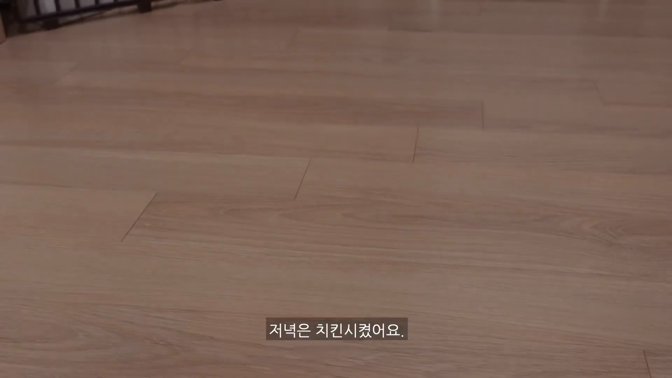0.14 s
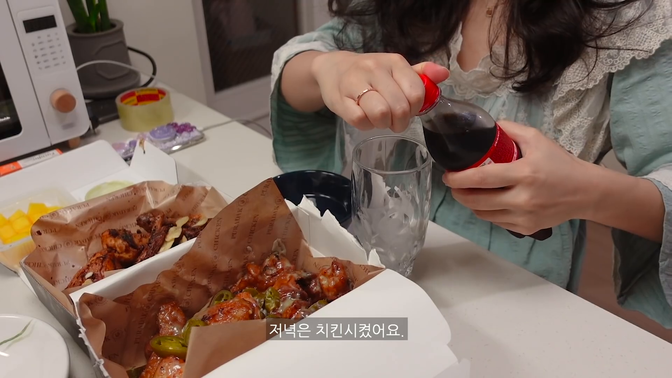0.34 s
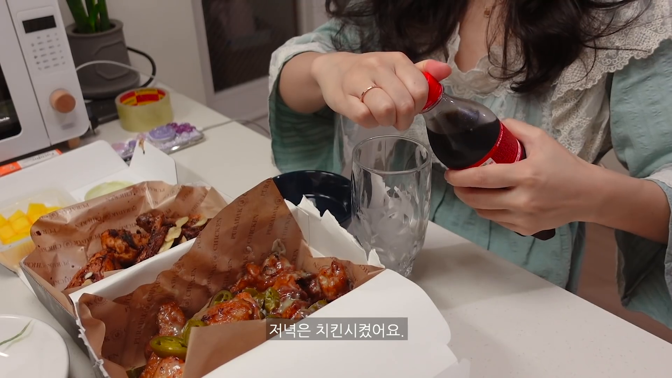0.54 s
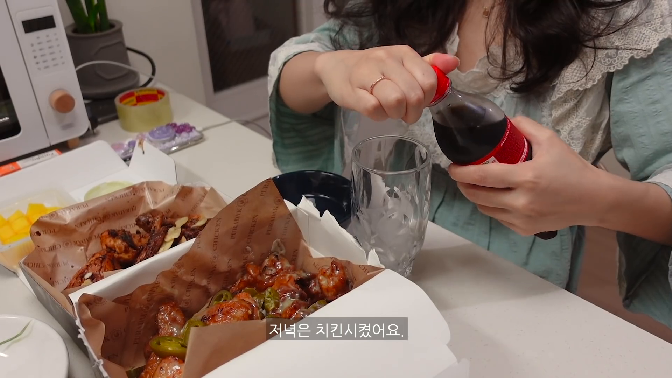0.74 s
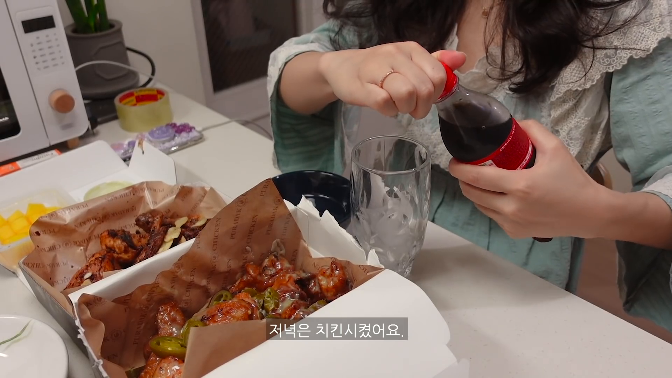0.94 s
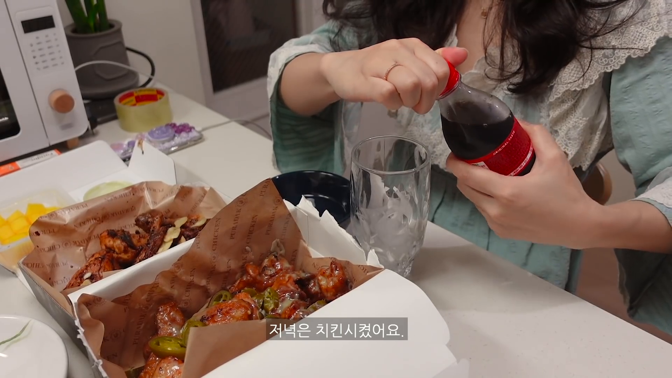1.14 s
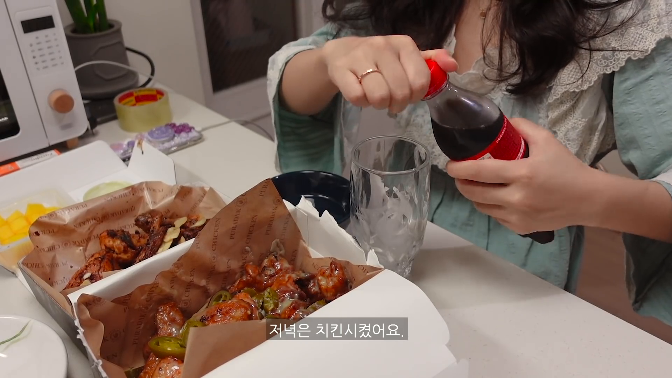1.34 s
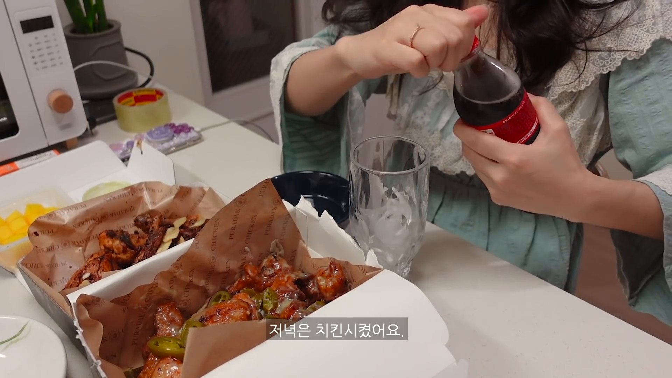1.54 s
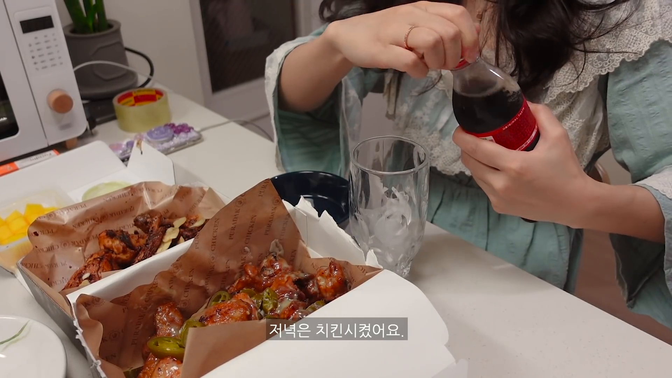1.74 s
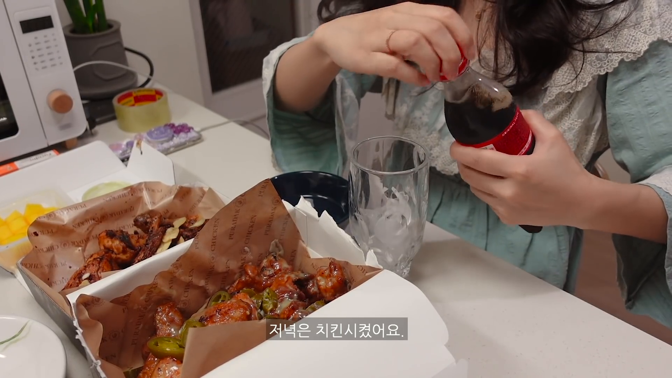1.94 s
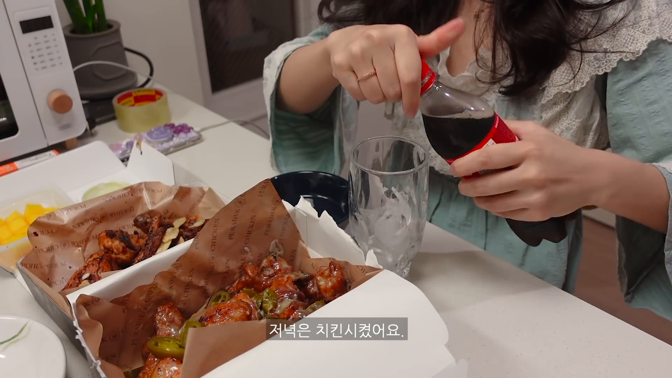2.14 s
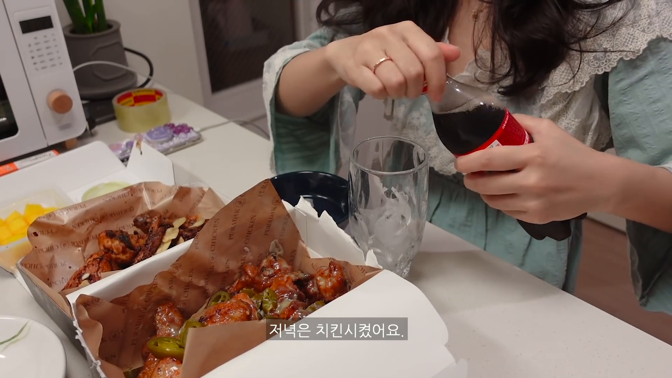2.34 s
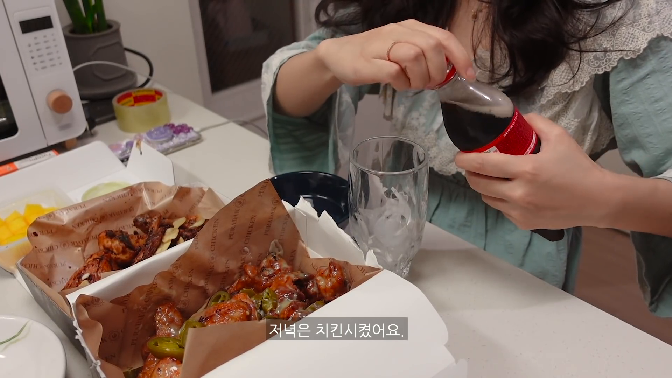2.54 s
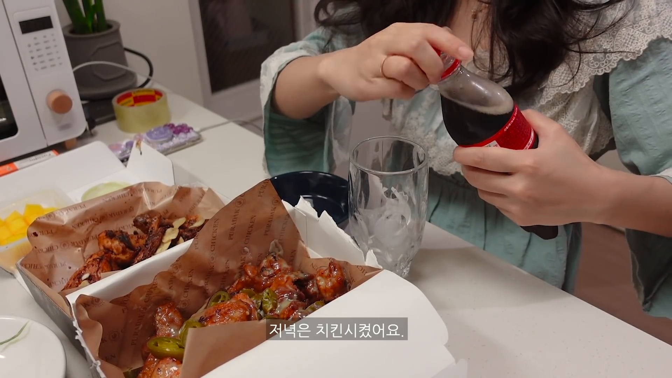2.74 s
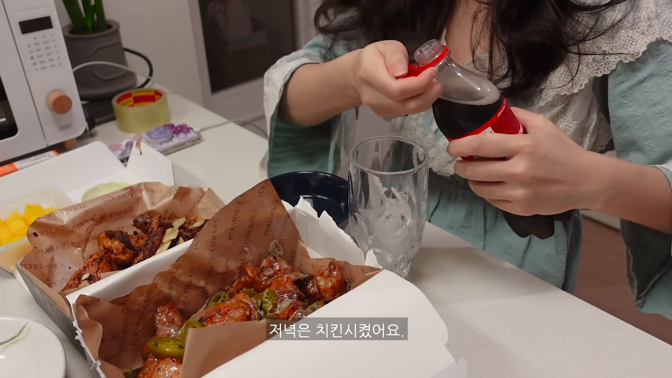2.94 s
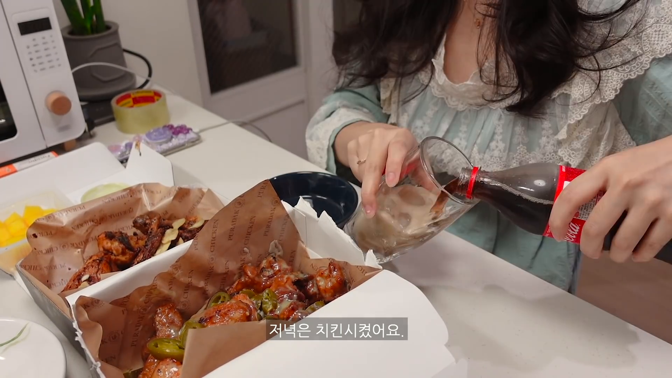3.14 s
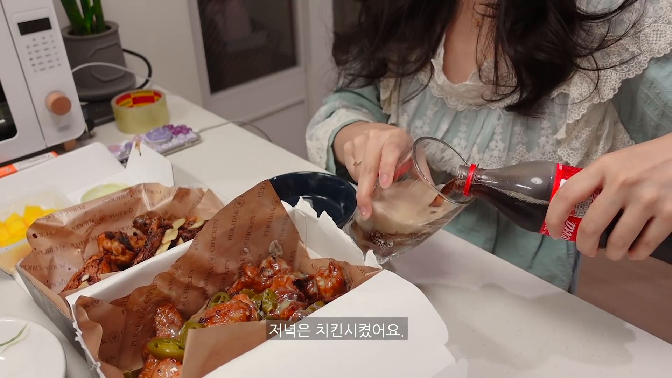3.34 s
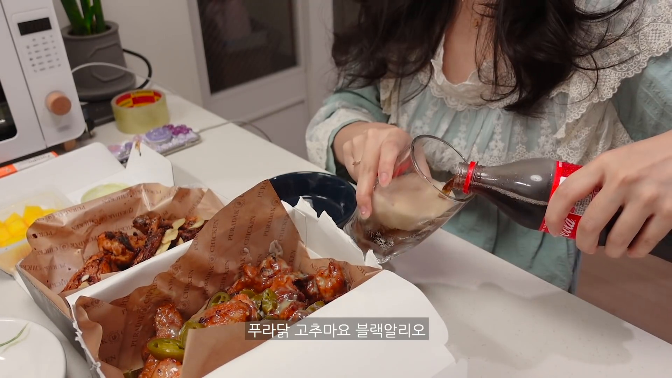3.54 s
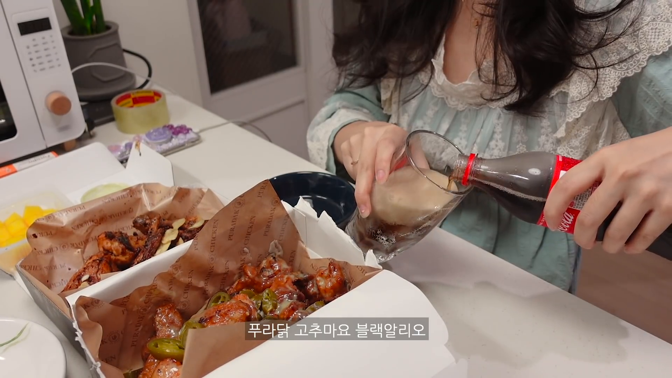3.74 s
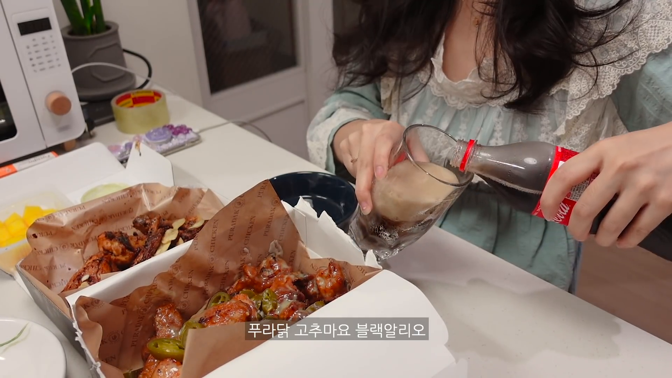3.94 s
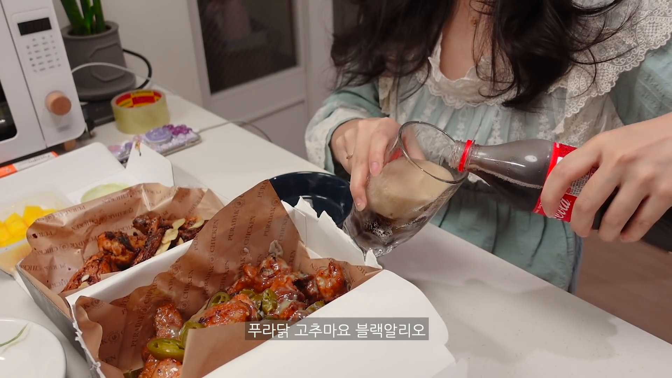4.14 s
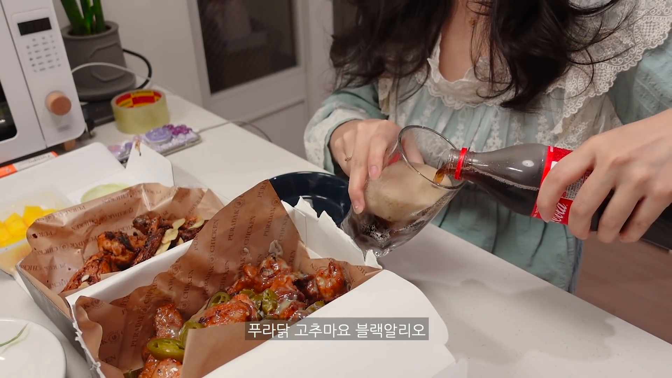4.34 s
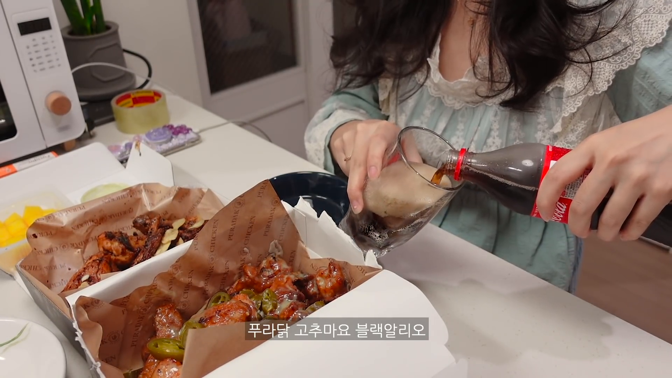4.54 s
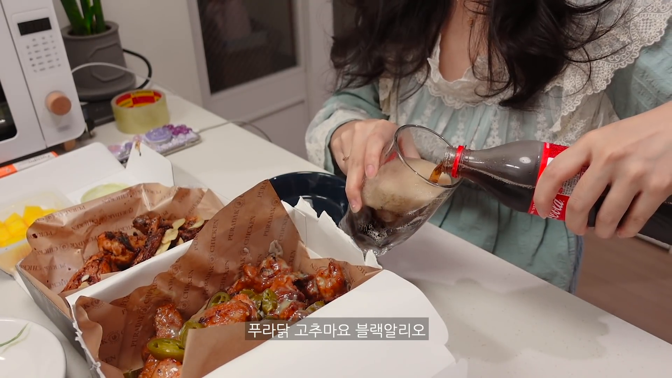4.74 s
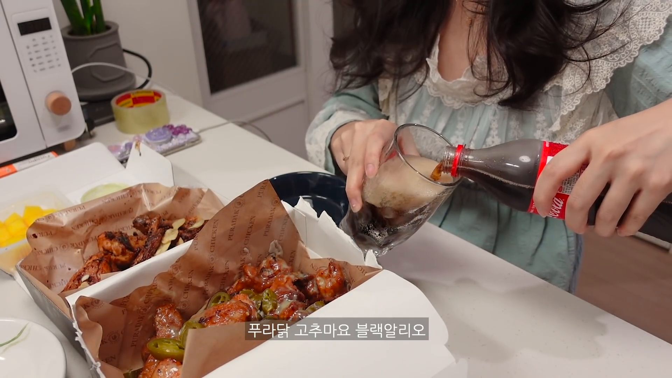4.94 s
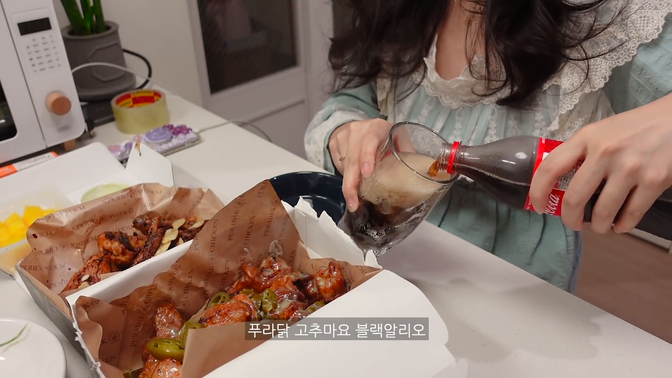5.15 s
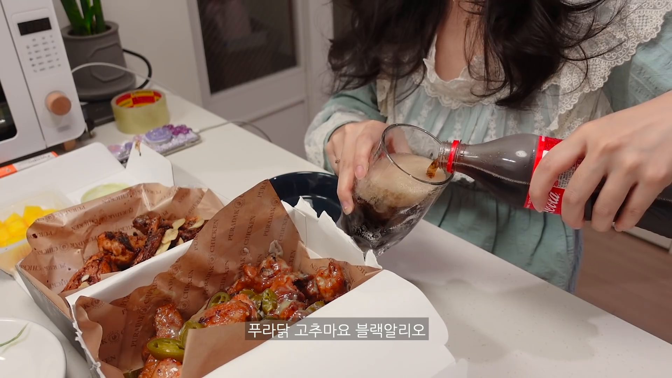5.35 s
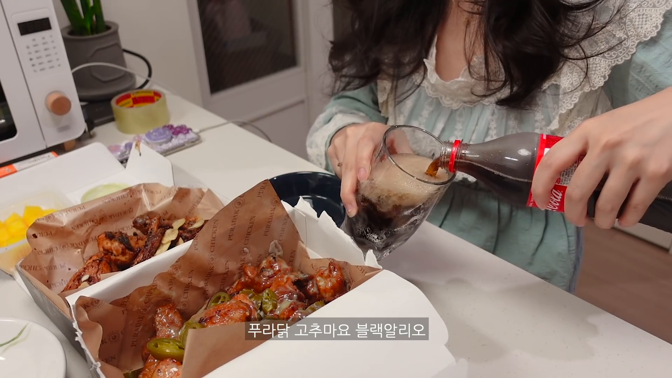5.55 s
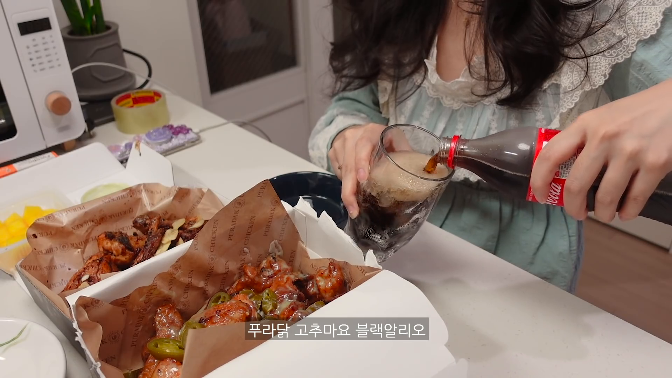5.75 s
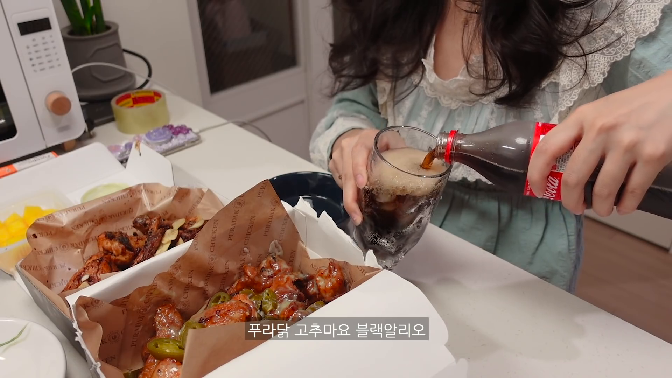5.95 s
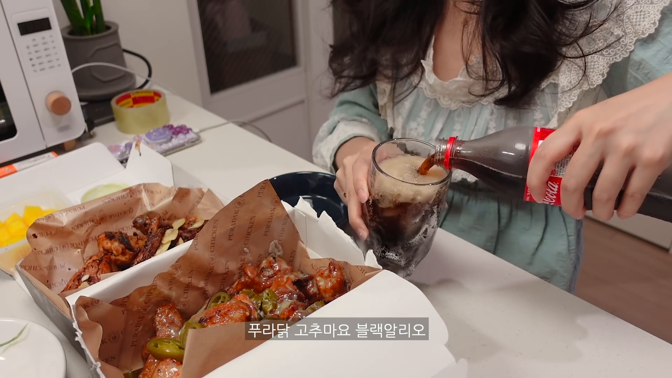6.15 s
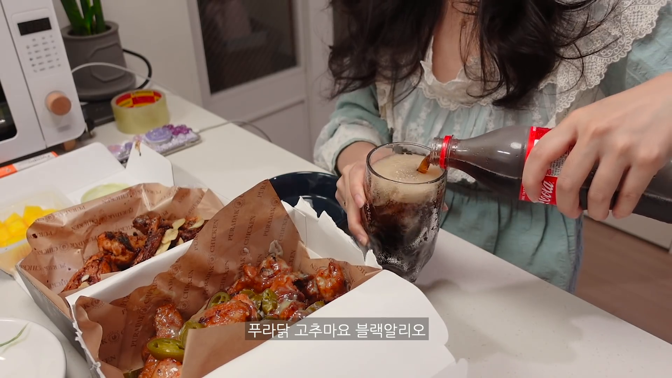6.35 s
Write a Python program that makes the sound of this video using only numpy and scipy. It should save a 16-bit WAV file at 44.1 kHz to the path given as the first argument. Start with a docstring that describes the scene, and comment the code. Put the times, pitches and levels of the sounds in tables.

```python
"""Three moments in a home kitchen, joined by hard cuts.
First a small metal piece jingles in decaying modes over a scuffle of filtered clicks and a hollow bump.
Then a plastic soda bottle opens over soft room noise: gas hisses as a jet of noise through the cap thread,
cap and seal ring snap as resonant cracks, dull spurts follow, and the cap squeaks one thin note.
Last, soda pours into a tilted glass: foam fizzes in tiny pops, bubbles gurgle, the bottle knocks, once loudly."""
import sys
import numpy as np
from scipy import signal
from scipy.fft import rfft, irfft
from scipy.io import wavfile
from scipy.ndimage import map_coordinates

SR = 44100
rng = np.random.default_rng(int(sys.argv[2]) if len(sys.argv) > 2 else 0)


def digitize_waveform(pressure):
    """Quantize a signal to 16-bit integers and store it at the path in sys.argv[1].

    Rows of a 2-D input are taken as channels; values are limited to [-1, 1].
    """
    field = np.atleast_2d(pressure).T
    bounded = np.clip(field, -1, 1)
    quanta = np.round(bounded * 32767).astype(np.int16)
    wavfile.write(sys.argv[1], SR, quanta)


N = 282240
T = np.arange(N) / SR  # time axis [s]

OPEN_S, POUR_S = 0.2425, 3.113  # cuts to the opening and to the pour
TOP_HZ = 15700  # upper edge of the final low-pass

# modes of the metal piece: (frequency [Hz], level [dB], t60 [s])
METAL_MODES = [(2860, 0.5, 0.3), (2880, -9, 0.35), (6660, -11, 0.22), (5800, -20, 0.2), (5630, 3.5, 0.064),
               (7994, 3.5, 0.14), (8100, -32, .25), (11500, -11, 0.18), (11800, -23, 0.45)]
# shakes of the metal piece: (time [s], level [dB], extra on its high modes [dB])
SHAKES = [(0.002, -35.5, -9), (0.078, -42.5, 0), (0.103, -45, 4)]
# colour of the scuffle: (frequency [Hz], level [dB])
SCUFFLE_COLOUR = [(60, -48), (250, -13), (500, -4), (750, 3.5), (1050, -4.5), (1550, 0.5), (2100, -7),
                  (2800, -1), (3700, -7), (5500, 2), (7000, -7.5), (11000, -24), (13000, -32)]
SCUFFLE_DB, SCUFFLE_FADE_DB_S = -38, 44  # starting level; steady fade in dB per second
# modes of the short hollow bump: (frequency [Hz], level [dB], t60 [s])
BUMP_MODES = [(762, 4, 1), (1180, -0.5, 0.27), (1657, 1, 0.25), (1730, -8, 0.19)]
BUMP_S, BUMP_DB = 0.227, -43.5

# flow of the escaping gas, before the trim: (time [s], level [dB])
GAS_FLOW = [(0.245, -25), (0.257, -22.5), (0.513, -35.5), (0.547, -34), (0.673, -40), (0.865, -34),
            (0.887, -29.5), (1.025, -27), (1.073, -31.5), (1.14, -45)]
# higher resonances of the thread channel: (frequency [Hz], width of each of two passes [Hz], level [dB])
THREAD_RESONANCES = [(4680, 580, 5.5), (5990, 730, -2), (7260, 2600, 2.5), (9050, 250, 6.5),
                     (10470, 900, 6.5), (11140, 670, 4.5), (13060, 3200, -1.5)]
# colour of the free jet: (frequency [Hz], level [dB])
JET_COLOUR = [(200, -49), (700, -39.5), (1000, -21.5), (1600, -13.5), (2300, -7), (3400, -6.5), (4500, -3),
              (8000, -2.5), (10500, -6), (13000, -12.5), (16000, -18)]
GAS_DB, GAS_FADE_DB_S = -1.5, 150  # trim; how fast the hiss dies away after the last flow row [dB per second]
# the gap widens as the cap turns, so its lowest resonance sinks: pitches, midpoint, time constant
GAP_TIGHT_HZ, GAP_WIDE_HZ, GAP_WIDENS_S, GAP_WIDENING_S = 2810, 2294, 0.75, 0.065
# then the seal lets go and most of the flow bypasses the thread channel: midpoint, time constant, power shares
SEAL_OPENS_S, SEAL_OPENING_S, BYPASS_TIGHT, BYPASS_LOOSE = 0.87, 0.018, 0.13, 0.85
NECK_HZ, NECK_WIDTH_HZ, NECK_DB = 266, 71, -42.5  # air in the bottle hums under the free jet; dB against it
GAS_ROOM_DB = -6  # share of the hiss that comes back from table and walls

# colour of the room's air noise: (frequency [Hz], level [dB])
KITCHEN_COLOUR = [(30, -26), (70, -40), (110, -27.5), (170, -18.5), (280, -15.5), (480, -16.5), (700, -9.5),
                  (1050, -1), (1450, -4), (2400, -10), (3200, -11.5), (7000, -19), (15000, -35.5)]
KITCHEN_DB = -58

# snaps of cap and seal ring: (time [s], level [dB], resonance [Hz], treble [dB])
SNAPS = [(1.311, -53, 6000, -4.5), (1.3896, -40.5, 4130, 5), (1.396, -43.5, 4060, 2),
         (1.511, -38.5, 2410, -11), (1.518, -37.5, 3260, -20), (1.570, -44.5, 4040, 0),
         (1.741, -49.5, 3060, -39), (1.784, -37.5, 6450, 6.5), (1.9695, -28, 4590, 10.5),
         (2.4257, -35.5, 5320, 7), (2.637, -43, 2200, -19), (2.714, -29.5, 4600, 9.5),
         (2.8546, -27.5, 4360, 8.5), (2.880, -31, 3520, 6.5), (2.9603, -26, 3800, 15),
         (2.994, -26.5, 4130, 5), (3.027, -38.5, 3440, -11), (3.0456, -25.5, 3000, 15),
         (3.047, -29.5, 2200, -20)]
# colour of the stiff plastic: (frequency [Hz], level [dB])
PLASTIC_COLOUR = [(100, -42), (400, -26), (700, -10), (1500, -1.5), (2500, 5), (4000, 5), (5700, 5),
                  (7700, 4.5), (10000, -6), (12000, -7), (16000, -14)]
# the harder the snap, the more its resonance stands out: base dB at a hard snap, and dB per dB of level
HARD_SNAP_DB, SNAP_RING_DB, RING_PER_DB = -24.5, 13, 0.77
SNAP_RATTLE_T60_S, SNAP_RATTLE_DB, SNAP_ROOM_DB = 0.04, 2, -3
CAP_RIGHT_DB = 1.5  # the cap sits a little to the right
# the hollow bottle sounding with some snaps, its pitch set by the grip: (time [s], level [dB], pitch [Hz])
HOLLOWS = [(1.390, -63, 468), (2.638, -68, 476), (2.853, -50.5, 1128), (2.961, -56, 649), (3.046, -50, 612)]
HOLLOW_T60_S = 0.42

# later twists let out last spurts of gas: (time [s], level [dB], t60 [s])
SPURTS = [(1.40, -52.5, 1), (1.511, -35, .36)]
SPURT_ATTACK_S, SPURT_TREBLE_DB = 0.0045, -9.5

# the cap squeaks faintly as it turns
SQUEAK_S, SQUEAK_HZ, SQUEAK_DB = 2.073, 2530, -59.5
SQUEAK_ATTACK_S, SQUEAK_HOLD_S, SQUEAK_T60_S = 0.053, 0.11, 0.2

# colour of the foam: (frequency [Hz], level [dB])
FOAM_COLOUR = [(60, -37), (300, -20.5), (1000, -1.5), (2800, 6), (4500, 2), (6300, 1), (7300, -2.5),
               (8200, 4.5), (10600, 1), (11700, 1.5), (12500, -1.5), (13600, 2), (16000, -2)]
# bands of the young foam's sizzle: (frequency [Hz], width of each of two passes [Hz], level [dB])
SIZZLE_BANDS = [(9320, 1300, -0.5), (13700, 1600, -12)]
# foam hisses steadily; it flares up when the first soda hits the dry glass, then settles
FOAM_DB, FLARE_DB, FLARE_S, FLARE_WIDTH_S = -57, 3.3, 3.67, 0.33
# the sizzle, in dB over the foam, grows until the flare and then thins out
SIZZLE_DB, SIZZLE_RISE_DB_S, SIZZLE_FADE_DB_S = -2.5, 9, 6
FOAM_ROOM_DB = -4  # share of the foam that comes back from table and walls

# flow of the pour, before the trim: (time [s], splash level [dB])
POUR_FLOW = [(3.16, -55.5), (3.4, -54.5), (3.77, -52.5), (5.24, -50.5), (5.49, -53.5), (6.09, -52),
             (6.39, -66)]
# colour of the splash: (frequency [Hz], level [dB])
SPLASH_COLOUR = [(100, -49), (300, -60.5), (500, -23.5), (780, -13), (1050, 3.5), (1650, -7), (2450, 5.5),
                 (3300, 3), (4000, 5.5), (5000, 4.5), (6000, -4.5), (8000, -10), (15000, -61)]
SPLASH_DB, WOBBLE_DB = -2.5, 1.5  # trim; rms size of the stream's wobble
# air resonances of the glass: (frequency [Hz], width [Hz], level [dB])
GLASS_RESONANCES = [(514, 20, 9), (676, 19, 8), (1100, 390, -5.5), (4600, 117, -6), (7140, 250, 4)]
# gulps of air dragged under by the stream: (time [s], level [dB], trim of its one large bubble [dB])
GULPS = [(3.114, -47.5, -1.5), (3.431, -59, 0.5), (3.558, -49.5, -16), (3.62, -48, -21), (3.774, -49.5, -4),
         (3.855, -50, 1), (3.921, -46.5, -23), (3.99, -49, -20), (4.262, -57.5, -1.5), (4.107, -42.5, -6),
         (4.348, -47, -26), (4.449, -43, -19), (4.51, -52.5, 4.5), (4.578, -45.5, -4.5),
         (4.899, -48.5, -17), (4.942, -54, -22), (5.028, -49.5, -18), (5.172, -42, -14),
         (5.332, -48.5, -17), (5.493, -51.5, -10.5), (5.686, -48, -7.5), (5.972, -50.5, -5),
         (6.03, -48, -8), (6.125, -52.5, -1)]
# colour of the churning water: (frequency [Hz], level [dB])
GULP_COLOUR = [(100, -31), (300, -60.5), (480, -11), (780, -2), (1050, 7.5), (1600, 5.5), (2600, 11),
               (3400, 5), (4700, 2.5), (6500, -6), (15000, -12)]
GULP_LENGTH_S, GULP_BUBBLE_HZ, GULP_DETUNE = 0.02302, 1102, 0.029  # detune: pitch spread, as a share
FALTER_DB, FALTER_S = -4.5, 0.066  # deepest dip of the flow, and its length just before each gulp
SMALL_GULP_DB, SMALL_GULP_BUBBLE_DB = -59.5, -3.5  # lesser gulps come at random

# knocks of the bottle on the glass: (time [s], level [dB], rattle t60 [s], treble [dB])
KNOCKS = [(4.1, -47.5, 0.011, -3), (4.448, -46, 0.058, -8), (5.17, -38.5, 0.038, -24),
          (6.2300, -26, 0.04, -2)]
# colour of the knocks: (frequency [Hz], level [dB])
KNOCK_COLOUR = [(100, -40), (280, -34), (400, -18), (650, -7), (950, -1), (1550, -2.5), (2200, 2),
                (3500, 2), (5200, -0.5), (6500, -6), (9000, -13), (15000, -22)]
# resonances of the bottle wall as it knocks: (frequency [Hz], width [Hz], level [dB])
WALL_RESONANCES = [(2200, 480, -2.5), (3480, 210, 4), (4630, 330, 7.5), (5950, 61, 16), (12000, 190, 7)]
# air in the glass ringing with each knock, before the knock colour:
# (frequency [Hz], level over the knock [dB], t60 [s])
KNOCK_RING = [(1036, -1.5, 0.049), (1120, -3, 0.12)]

# stereo width of the microphone pair: (frequency [Hz], level of the side signal [dB])
MIC_WIDTH = [(150, -13.5), (500, -6), (1000, -5.5), (2500, 0), (6000, 2.5), (13000, 3.5)]


def undb(db):
    """Decibels to gain."""
    return 10 ** (np.asarray(db) / 20)


def curve(rows, axis=1):
    """One column of a table, joined by straight lines in time."""
    rows = np.asarray(rows)
    return np.interp(T, rows[:, 0], rows[:, axis])


def ease(s, time_constant):
    """A smooth step from 0 to 1 around time s."""
    return (1 + np.tanh((T - s) / time_constant / 2)) / 2


def unit(x):
    """Scale to rms 1."""
    return x / np.sqrt(np.mean(x ** 2))


def strength(x, db):
    """Give a short sound the energy of 10 ms at this level."""
    return unit(x) * np.sqrt(SR / 100 / x.shape[-1]) * undb(db)


def fade(t, t60):
    """Exponential decay, 60 dB down after t60."""
    return np.exp(-np.log(1000) * t / t60)


def add(track, s, sound):
    """Mix a sound into a track from time s on."""
    start = max(int(s * SR), 0)
    track[..., start:start + sound.shape[-1]] += sound[..., :N - start]


def colour(x, points):
    """Causal minimum-phase filter with the given (Hz, dB) shape."""
    n = x.shape[-1]
    hz, db = np.transpose(points)
    log_hz = np.log(np.fft.rfftfreq(n, 1 / SR) + 1)
    log_gain = np.log(undb(np.interp(log_hz, np.log(hz), db)))
    # folding the cepstrum onto positive times makes the filter causal
    folded = irfft(log_gain, n) * (1 + np.sign(np.fft.fftfreq(n)))
    return irfft(rfft(x) * np.exp(rfft(folded)), n)


def resonate(x, peaks):
    """Parallel resonances (Hz, width Hz, dB)."""
    total = 0
    for hz, width, db in peaks:
        b, a = signal.iirpeak(min(hz, SR / 2 - 1), hz / width, SR)
        total = total + undb(db) * signal.lfilter(b, a, x)
    return total


def steep(x, peaks):
    """Resonances with steep skirts: each is applied twice."""
    return sum(resonate(resonate(x, [(hz, width, db)]), [(hz, width, 0)]) for hz, width, db in peaks)


def spread(pair, side_db, pan_db=0):
    """Two unrelated signals as middle and side of a stereo sound; positive pan leans left."""
    mid, side = pair[0], pair[1] * undb(side_db)
    return np.array([(mid + side) * undb(pan_db / 2), (mid - side) * undb(-pan_db / 2)])


def pops(count, scatter_db):
    """Two trains of tiny clicks, count a second; most are faint, a few stand out."""
    size = undb(scatter_db * np.minimum(rng.exponential(size=(2, N)), 2 * np.pi))
    sign = np.sign(rng.standard_normal((2, N)))
    return unit(size * sign * (rng.random((2, N)) < count / SR))


def ring(modes):
    """Freely decaying modes (Hz, dB, t60 s)."""
    t = np.arange(SR // 2) / SR
    return sum(undb(db) * fade(t, t60) * np.sin(2 * np.pi * hz * t) for hz, db, t60 in modes)


def blow(t60, crack_db, side_db):
    """A sharp crack and the brief rattle of the wall behind it, which differs left and right."""
    t = np.arange(SR // 4) / SR
    rattle = spread(rng.standard_normal((2, len(t))) * fade(t, t60), side_db)
    return rattle / np.linalg.norm(rattle[0]) + undb(crack_db) * (t == 0)


def room(x, t60=0.4, treble_t60=0.45, build_s=0.0085, side_db=-7):
    """The kitchen's diffuse echo; the sound below and above 8 kHz dies at its own rate."""
    t = np.arange(SR // 2) / SR
    noise = rng.standard_normal((2, len(t)))
    low = signal.sosfilt(signal.butter(2, 8000, fs=SR, output="sos"), noise)
    # reversed noise keeps the treble unrelated to the low part
    high = signal.sosfilt(signal.butter(2, 8000, "high", fs=SR, output="sos"), noise[:, ::-1])
    tail = (low * fade(t, t60) + high * fade(t, treble_t60)) * (1 - np.exp(-t / build_s))
    echo = spread(tail / np.linalg.norm(tail[0]), side_db)
    return signal.fftconvolve(x[None], echo, axes=1)[:, :N]


def jingle():
    """A shaken metal piece rings in its own modes, brighter or duller from shake to shake."""
    metal = np.zeros(N)
    for s, db, high_db in SHAKES:
        add(metal, s, undb(db) * colour(ring(METAL_MODES), [(5500, 0), (7800, high_db)]))
    return metal


def scuffle():
    """Dense small frictional clicks on the floor, dying away steadily."""
    friction = unit(colour(pops(6000, 0.79), SCUFFLE_COLOUR))
    return spread(friction * undb(SCUFFLE_DB - SCUFFLE_FADE_DB_S * T), -6)


def bump():
    """A hollow body is struck near the end of the scuffle and rings in a few low modes."""
    track = np.zeros(N)
    add(track, BUMP_S, undb(BUMP_DB) * ring(BUMP_MODES))
    return track


def gas():
    """A turbulent jet sounds the thread channel, then broadens as the cap comes loose."""
    gap_hz = GAP_TIGHT_HZ + (GAP_WIDE_HZ - GAP_TIGHT_HZ) * ease(GAP_WIDENS_S, GAP_WIDENING_S)
    gap = unit(steep(pops(20000, 0.63), [(GAP_TIGHT_HZ, 750, 0)]))
    # reading the noise ever more slowly lowers its resonance
    read_at = np.cumsum(gap_hz / GAP_TIGHT_HZ)
    gap = np.array([map_coordinates(side, [read_at], mode="wrap") for side in gap])
    higher = unit(steep(pops(20000, 2.0), THREAD_RESONANCES))
    channel = unit(higher + undb(-9.5) * gap)

    neck = undb(NECK_DB) * unit(steep(pops(20000, 1.3), [(NECK_HZ, NECK_WIDTH_HZ, 0)]))
    free_jet = unit(colour(pops(20000, 1.4), JET_COLOUR)) + neck
    free = BYPASS_TIGHT + (BYPASS_LOOSE - BYPASS_TIGHT) * ease(SEAL_OPENS_S, SEAL_OPENING_S)
    free = np.clip(free, 0, 1)
    jet = np.sqrt(1 - free) * channel + np.sqrt(free) * free_jet

    last_s = GAS_FLOW[-1][0]
    flow_db = GAS_DB + curve(GAS_FLOW) - GAS_FADE_DB_S * np.maximum(T - last_s, 0)
    hiss = spread(jet * undb(flow_db), -33, -1.4)
    echo = room(hiss.mean(axis=0), t60=0.23, treble_t60=0.21, build_s=0.0013, side_db=-6.5)
    return hiss + undb(GAS_ROOM_DB) * echo


def kitchen():
    """Soft steady air noise of the room."""
    air = unit(colour(rng.standard_normal((2, N)), KITCHEN_COLOUR))
    return undb(KITCHEN_DB) * spread(air, -1.5)


def cap():
    """Each snap cracks the stiff plastic and rings one resonance of its own; the kitchen answers."""
    direct, send = hollow_bottle(), np.zeros(N)
    whole = colour(signal.unit_impulse(SR // 4), PLASTIC_COLOUR)
    for s, db, hz, treble_db in SNAPS:
        tilt = [(5000, 0), (12000, treble_db)]
        ring_db = SNAP_RING_DB + RING_PER_DB * (db - HARD_SNAP_DB)
        rattle = undb(SNAP_RATTLE_DB) * blow(SNAP_RATTLE_T60_S, crack_db=-13, side_db=-6)
        click = blow(0.0029, crack_db=-7, side_db=-19.5)
        snap = colour(rattle + click, PLASTIC_COLOUR)
        snap = snap + resonate(snap, [(hz, 400, ring_db + 4.5)])
        add(direct, s, strength(colour(snap, tilt), db))
        # the room hears the whole wall at once, so its colour is smoother
        smooth = whole + resonate(whole, [(hz, 700, ring_db - 1)])
        add(send, s, strength(colour(smooth, tilt), db + SNAP_ROOM_DB))
    # cloth and soft furnishings swallow the top of the echo
    echo = room(colour(send, [(8500, -2.5), (14000, -4.5)]), side_db=-9.5)
    pan_db = np.array([[-1], [1]]) * CAP_RIGHT_DB / 2
    return (direct + echo) * undb(pan_db)


def hollow_bottle():
    """Some snaps set the hollow bottle ringing in two close modes."""
    track = np.zeros((2, N))
    for s, db, hz in HOLLOWS:
        modes = [(hz, 0, HOLLOW_T60_S), (1.09 * hz, -6, HOLLOW_T60_S)]
        add(track, s, undb(db) * ring(modes))
    return track


def spurts():
    """What pressure is left escapes in dull, fading spurts as the cap turns on."""
    envelope = 0
    for s, db, t60 in SPURTS:
        age = np.maximum(T - s, 0)
        envelope = envelope + undb(db) * np.minimum(age / SPURT_ATTACK_S, 1) * fade(age, t60)
    jet = colour(pops(9000, 1.3), JET_COLOUR)
    dull_jet = colour(jet, [(1200, 6.5), (3500, -0.5), (8000, SPURT_TREBLE_DB)])
    return spread(unit(dull_jet) * envelope, -8.5, -1.1)


def squeak():
    """The turning cap sings one thin note: attack, hold, release."""
    age = T - SQUEAK_S
    attack = np.clip(age / SQUEAK_ATTACK_S, 0, 1)
    release = fade(np.maximum(age - SQUEAK_ATTACK_S - SQUEAK_HOLD_S, 0), SQUEAK_T60_S)
    return undb(SQUEAK_DB) * attack * release * np.sin(2 * np.pi * SQUEAK_HZ * T)


def foam():
    """Thousands of tiny bubbles burst; the youngest and finest sizzle high."""
    bed = unit(colour(pops(5000, 1.2), FOAM_COLOUR))
    fine = unit(steep(pops(6500, 1.3), SIZZLE_BANDS))
    age = T - FLARE_S
    sizzle_db = SIZZLE_DB + np.minimum(SIZZLE_RISE_DB_S * age, -SIZZLE_FADE_DB_S * age)
    foam_db = FOAM_DB + FLARE_DB * np.exp(-(age / FLARE_WIDTH_S) ** 2)
    fizz = spread((bed + fine * undb(sizzle_db)) * undb(foam_db), -13.5, 0.82)
    return fizz + undb(FOAM_ROOM_DB) * room(fizz.mean(axis=0), side_db=-8.5)


def stream():
    """The stream splashes, traps small bubbles and gulps air; all of it sounds in the glass."""
    falter, swell, big_bubbles = gulps()
    # the stream wobbles, so the splash comes in small surges
    slow_band = signal.butter(2, [5, 25], "band", fs=SR, output="sos")
    wobble = unit(signal.sosfilt(slow_band, rng.standard_normal(N)))
    flow_db = SPLASH_DB + curve(POUR_FLOW) + WOBBLE_DB * wobble + FALTER_DB * falter
    splash = unit(colour(pops(4000, 0.85), SPLASH_COLOUR)) + unit(small_bubbles()) / 2
    churn = unit(colour(pops(3000, 1.2), GULP_COLOUR))
    liquid = spread(splash * undb(flow_db), -9, 0.8)
    liquid = liquid + spread(churn * swell * undb(-0.5), -16) + big_bubbles
    # so small a vessel radiates no bass
    liquid = signal.sosfilt(signal.butter(9, 400, "high", fs=SR, output="sos"), liquid)
    return liquid + resonate(liquid, GLASS_RESONANCES) + undb(-8.5) * room(liquid.mean(axis=0))


def small_bubbles(count=2200):
    """Small trapped bubbles ring at random times, pitches, sizes and places, as middle and side."""
    bubbles = np.zeros((2, N))
    for when, pitch, size, place in rng.random((count, 4)):
        hz = 1100 * 4.7 ** np.sqrt(pitch)
        blip = bubble(hz, cycles=36, glide=0.08) * undb(12 * size ** 3)
        s = POUR_S + when * (N / SR - POUR_S)
        add(bubbles, s, np.outer([1, 2 * np.sin(2 * np.pi * place)], blip))
    return bubbles


def bubble(hz, cycles, glide):
    """A trapped bubble rings, rising in pitch as it nears the surface."""
    length_s = cycles / hz
    age = np.arange(int(length_s * SR)) / (length_s * SR)
    return fade(age, 1) * np.sin(2 * np.pi * cycles * age * (1 + glide * age / 2))


def gulps(count=9):
    """The flow falters, then a swell of churning carries one larger bubble under; gives all three."""
    falter, swell, big_bubbles = np.zeros((3, N))
    span_s = KNOCKS[-1][0] - POUR_S  # lesser gulps end by the last knock
    small = [(POUR_S + when * span_s, SMALL_GULP_DB, SMALL_GULP_BUBBLE_DB) for when in rng.random(count)]
    age = np.arange(SR // 4) / SR / (GULP_LENGTH_S / 2)
    for s, db, bubble_db in small + list(GULPS):
        hz = GULP_BUBBLE_HZ * (1 + GULP_DETUNE * rng.standard_normal())
        add(falter, s - FALTER_S, undb(db) * np.hanning(int(FALTER_S * SR)))
        add(swell, s, undb(db) * age * np.exp(1 - age))
        big = 2 * bubble(hz, cycles=60, glide=0.12)
        add(big_bubbles, s + GULP_LENGTH_S / 4, undb(db + bubble_db) * big)
    return falter / falter.max(), swell, big_bubbles


def knocks():
    """The half-empty bottle knocks on the glass: wall resonances, ringing air and a short echo."""
    direct, send = np.zeros((2, N)), np.zeros(N)
    for s, db, t60, treble_db in KNOCKS:
        tilt = [(2500, 0), (7000, treble_db)]
        knock = colour(colour(blow(t60, crack_db=-9.5, side_db=-10.5), KNOCK_COLOUR), tilt)
        add(direct, s, strength(knock + resonate(knock, WALL_RESONANCES), db))
        add(direct, s, undb(db) * colour(ring(KNOCK_RING), KNOCK_COLOUR))
        thump = colour(colour(signal.unit_impulse(SR // 4), KNOCK_COLOUR), tilt)
        add(send, s, strength(thump, db))
    return direct + undb(-4) * room(send, t60=0.18, treble_t60=0.24, build_s=0.0039, side_db=-10)


def scene():
    """The three moments, one after the other."""
    struck = jingle() + bump()
    floor = struck + undb(-3) * room(struck) + scuffle()
    opening = gas() + kitchen() + cap() + spurts() + squeak()
    pour = foam() + stream() + knocks()
    return floor * (T < OPEN_S) + opening * ((T >= OPEN_S) & (T < POUR_S)) + pour * (T >= POUR_S)


def record(dry):
    """The microphones hear the treble wider than the bass; a steep low-pass cuts the top."""
    mid = (dry[0] + dry[1]) / 2
    side = colour((dry[0] - dry[1]) / 2, MIC_WIDTH)
    low_pass = signal.ellip(10, 0.2, 80, TOP_HZ, fs=SR, output="sos")
    return signal.sosfilt(low_pass, np.array([mid + side, mid - side]))


dry = scene()
out = record(dry)
digitize_waveform(out)
```